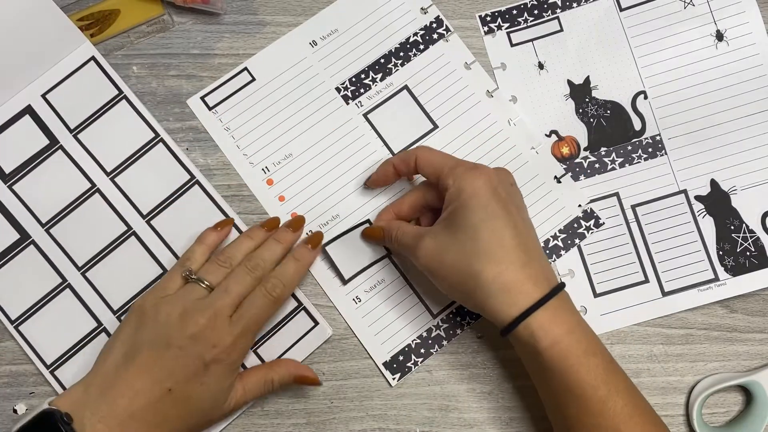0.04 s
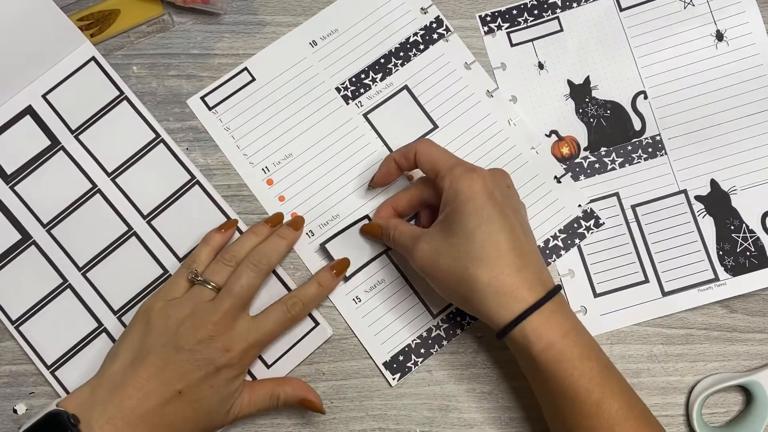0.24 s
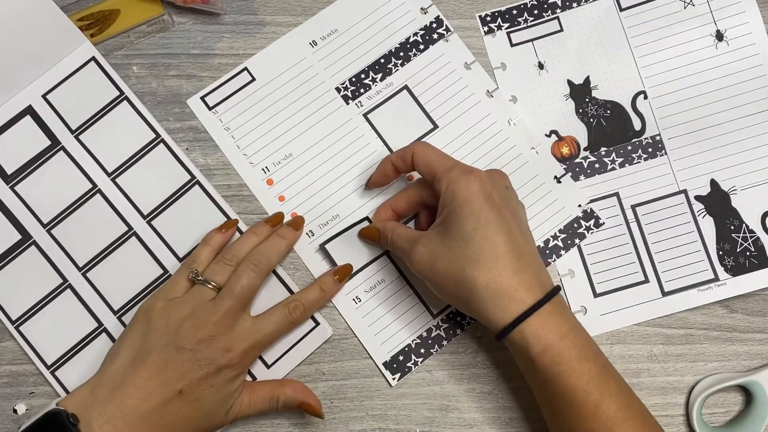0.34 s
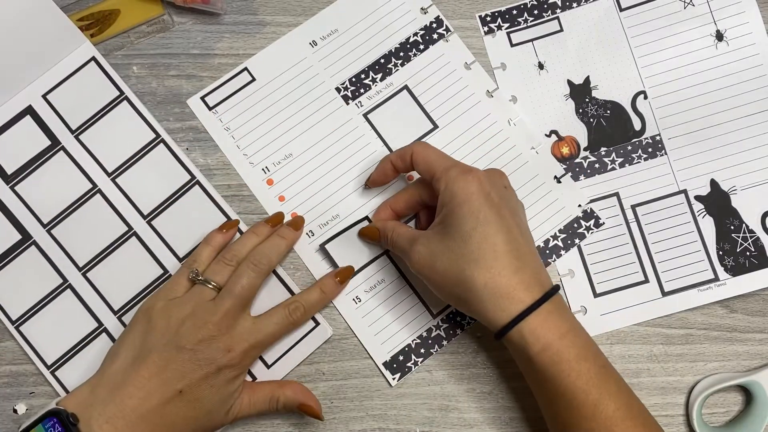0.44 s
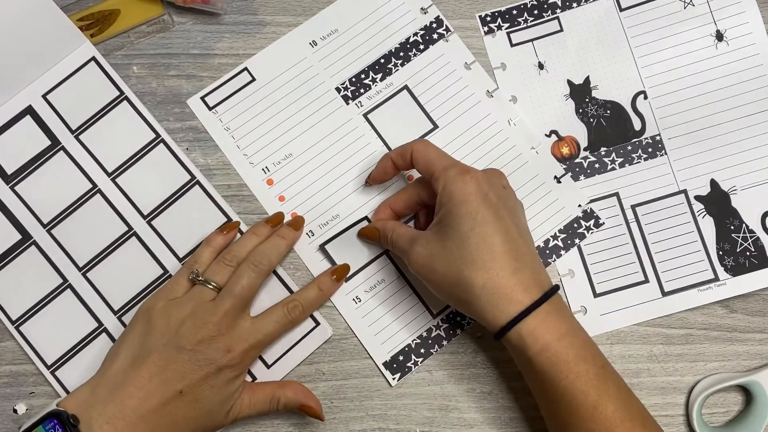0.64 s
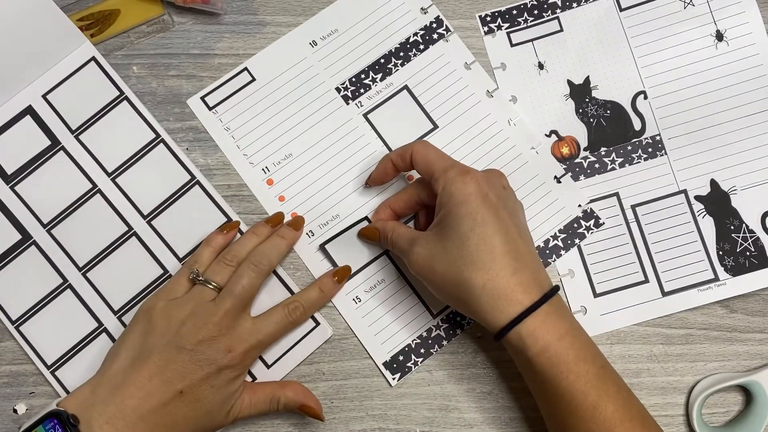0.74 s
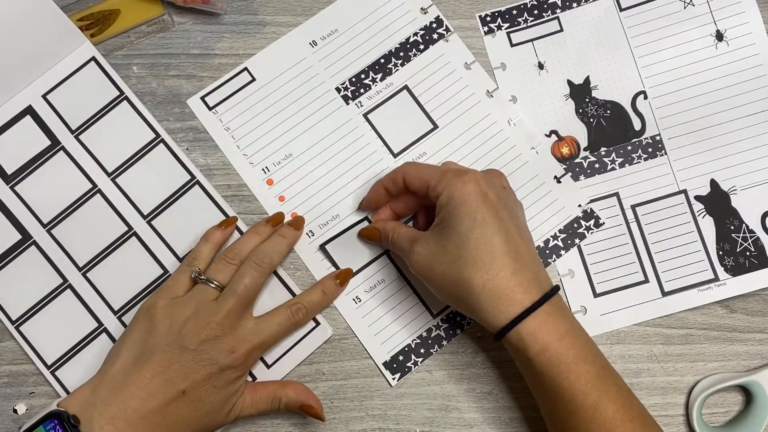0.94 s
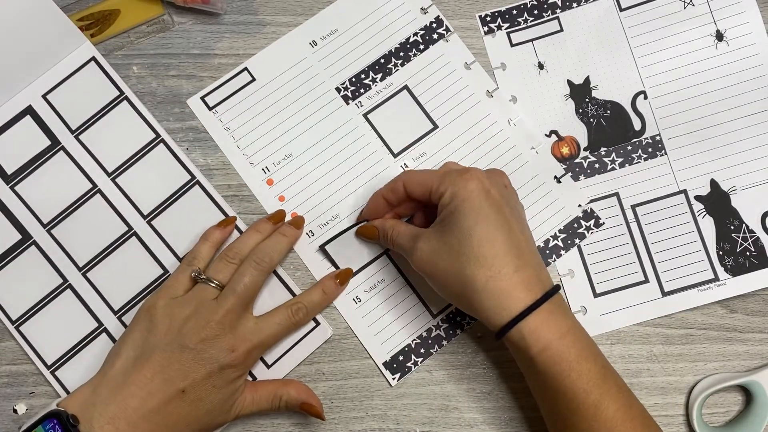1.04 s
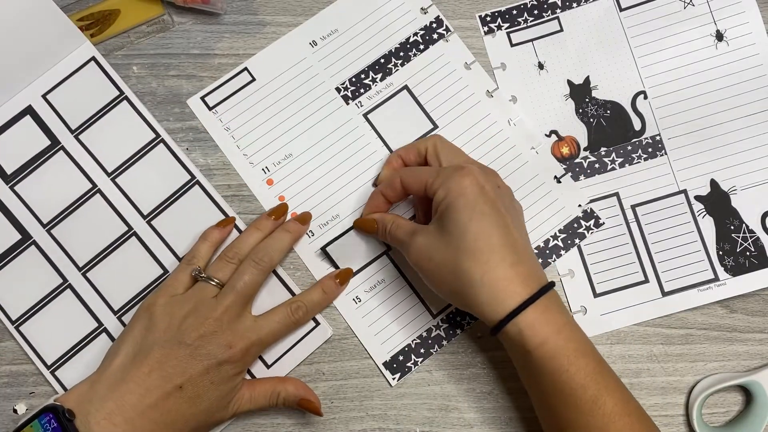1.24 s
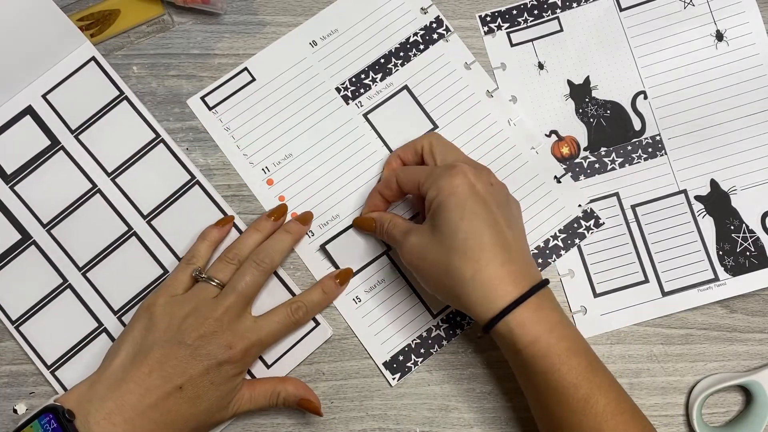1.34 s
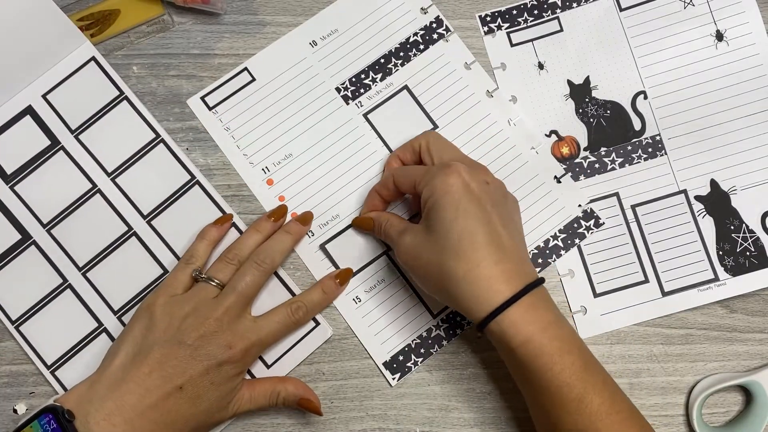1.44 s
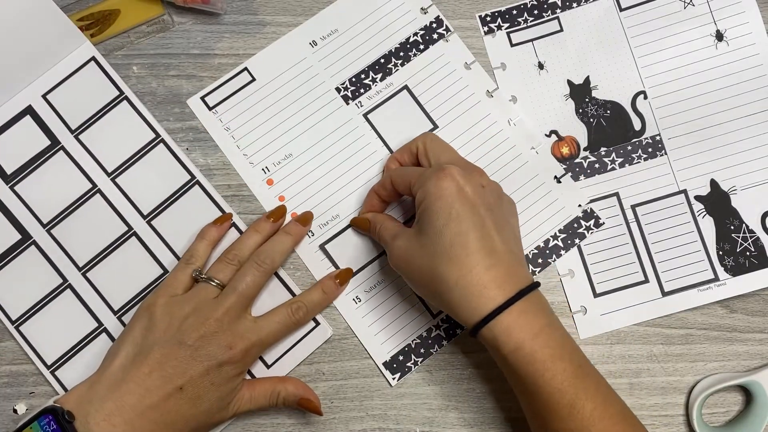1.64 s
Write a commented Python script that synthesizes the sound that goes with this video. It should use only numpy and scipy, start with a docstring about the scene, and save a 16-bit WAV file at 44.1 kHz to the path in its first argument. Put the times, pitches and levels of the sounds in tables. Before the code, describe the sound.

A paper sticker pops loose with a sharp, dry snap about a second in, after faint glue crackles and a soft nail tap; low wavering hum behind, small room, close stereo microphone.

```python
"""A small room, heard close by a stereo microphone: fingers work a paper sticker on a planner page.
The glue lets go in short crackling rips made of dense filtered clicks, and the paper slides as softer grains.
Once the stiff sticker snaps free: a filtered impulse, decaying modes, a noisy flutter and a knock on the page.
Fingernails tap softly in short noise bursts; a low machine hum of sines wavers behind, over room air."""
import sys
import numpy as np
from scipy import signal
from scipy.fft import rfft, irfft
from scipy.io import wavfile

SR = 44100
rng = np.random.default_rng(int(sys.argv[2]) if len(sys.argv) > 2 else 0)


def wrap_up_sound(samples):
    """Save the sound to the file named by the first command line argument, as 16-bit audio."""
    columns = np.atleast_2d(samples).T
    # keep every value between -1 and 1, then stretch to whole-number steps
    tamed = np.clip(columns, -1, 1)
    steps = np.round(tamed * 32767).astype(np.int16)
    wavfile.write(sys.argv[1], SR, steps)


N = 74970  # length [samples]

# Machine hum, gliding between points: (time [s], pitch [Hz], level [dB rms])
HUM_PATH = [(0, 56.7, -50.5), (.156, 54.5, -54), (.226, 54.5, -46.5), (.292, 55, -53.5), (.38, 54.5, -45.5),
            (.76, 54.58, -45.5), (.85, 54.76, -42), (1.13, 57.02, -45.5), (1.216, 57.83, -53.5),
            (1.36, 58.8, -46), (1.42, 59.74, -60), (1.7, 60.07, -50.5)]
# Faint tones of the machine: (pitch [Hz], level [dB rms])
MACHINE_TONES = [(106.5, -61.5), (215, -76.5), (268, -75), (366, -73.5), (586, -79), (668, -80.5),
                 (846, -83)]
# Spectrum of the room air: (frequency [Hz], relative level [dB])
AIR_COLOUR = [(15, -33.5), (28, -19.5), (45, -1), (80, 1), (125, -0.5), (200, -15.5), (370, -18),
              (480, -22), (850, -26), (1150, -37), (1750, -36), (2300, -48), (5500, -53), (7500, -63.5),
              (11500, -60), (16000, -74)]
AIR_DB, AIR_WIDE_HZ = -54.5, 272.8  # air level; the sides differ only above this frequency

# Soft nail taps on the page: (time [s], strength [dB])
NAIL_TAPS = [(.141, -59), (0.8757, -35), (.946, -51.5), (1.531, -58.5), (1.5847, -45)]
# Spectrum of a nail tap: (frequency [Hz], relative level [dB])
TAP_COLOUR = [(300, -12), (1000, -11), (1550, -4), (1850, -8), (2350, 1), (2900, -6), (4000, -13),
              (5500, -41), (12000, -42.5)]
# Fingertips rubbing the page: (start [s], length [s], level [dB])
FINGER_RUBS = [(.13, 0.017, -77.5), (.425, 0.054, -81), (1.525, .02, -78.5)]
# Spectrum of the rubbing: (frequency [Hz], relative level [dB])
RUB_COLOUR = [(400, -25), (1000, -6.5), (1500, 2), (1900, -2), (2600, -20), (6000, -27)]
# Spectrum of the page's dull thud: (frequency [Hz], relative level [dB])
PAGE_COLOUR = [(40, -23.5), (130, 2), (280, 0), (460, -2), (700, -16), (1500, -28), (6000, -58.5)]
PRESS_S, PRESS_LEN_S, PRESS_DB = 1.02, .028, -56.5  # a fingertip presses the page
SETTLE_DB, SETTLE_T60_S = -50.5, .15  # the page settles after the snap

# Rips of glue: (start [s], length [s], level [dB])
GLUE_RIPS = [(.024, 0.023, -77), (.2628, 0.013, -51), (.294, .018, -69), (.55, 0.0027, -77),
             (.592, 0.029, -78.5), (1.0005, .007, -56.5), (1.061, .011, -57.5)]
# Spectrum of a rip: (frequency [Hz], relative level [dB])
GLUE_COLOUR = [(300, -20), (1400, -20), (2500, -13), (3800, -20), (4700, -7), (5800, 2), (7000, -6),
               (7900, -4), (9000, -8.5), (11400, -8), (13500, -18.5), (16000, -17.5)]
# Lone ticks of glue, and at 1.0866 s the freed sticker's bounce: (time [s], strength [dB])
TICKS = [(.0205, -43), (1.0624, -31), (1.066, -34), (1.0728, -28.5), (1.075, -27), (1.0866, -16.5),
         (1.0903, -24), (1.3675, -40)]
# Spectrum of a tick: (frequency [Hz], relative level [dB])
TICK_COLOUR = [(500, -30), (2000, -22), (4000, -17), (6000, -1), (9000, 1), (11500, 0), (13500, -7),
               (16000, -10)]
# The sticker flexing, before the crease and flex gains: (start [s], length [s], level [dB])
STICKER_CREASES = [(.9645, 0.0056, -68), (.974, 0.014, -70), (1.182, 0.0071, -55)]
# Spectrum of a crease: (frequency [Hz], relative level [dB])
CREASE_COLOUR = [(500, -18), (1400, -15), (2000, -7), (3200, -3), (3800, -7.5), (5000, -9), (6600, -4),
                 (8500, -15), (12000, -18), (15500, -27)]
# Resonances of the lifted sticker as it flexes: (centre [Hz], width [Hz], relative gain [dB])
FLEX_RESONANCES = [(2900, 400, -1), (4393, 220, 2), (5535, 340, 1.5)]
# Paper sliding under the fingers, gliding between points: (time [s], level [dB])
SLIDE_LEVEL = [(0, -67.5), (.09, -82.5), (.14, -81.5), (.19, -100), (.24, -83), (.35, -88.5), (.42, -78),
               (.46, -108), (.56, -87.5), (.62, -82.5), (.68, -89.5), (.77, -81.5), (.83, -96), (.94, -86),
               (1.0, -69.5), (1.05, -68.5), (1.1, -51.5), (1.16, -100)]
# Spectrum of sliding paper: (frequency [Hz], relative level [dB])
PAPER_COLOUR = [(500, -16), (2000, -10.5), (4000, -10.5), (5500, 3.5), (6500, -1.5), (7500, -15),
                (10000, -11.5), (12500, -12.5), (16000, -21.5)]
STRAIN_S, STRAIN_LEN_S, STRAIN_DB = 1.071, 0.006, -47  # the last glue tears just before the snap
GRAINS_PER_S, GRAIN_SCATTER_DB = 3000, 4.5

# Spectrum of the snap's crack: (frequency [Hz], relative level [dB])
CRACK_COLOUR = [(200, -17), (750, -26), (1200, -14), (1600, -14), (2100, -6), (3200, -7), (4200, -5),
                (6100, 2), (7000, 1), (7700, -8), (8400, -6), (10500, -2.5), (12300, -1), (13300, -7),
                (14500, -6), (16300, -13)]
# The sticker's ring after the snap: (pitch [Hz], relative amplitude [dB], decay by 60 dB [s])
STICKER_MODES = [(1924, -43, .025), (2420, -31.5, 0.03), (3214, -37, .027), (4540, -28, .02),
                 (5100, -38.5, .025), (5963, -22.5, 0.014), (6530, -39.5, .015), (8220, -35, .018),
                 (9050, -30.5, 0.0065), (10190, -28, 0.018), (11290, -41, .018), (12035, -32.5, 0.018)]
SNAP_S, CRACK_DB, RING_DB = 1.0804, 0.5, -2
FLUTTER_DB, FLUTTER_T60_S = -28, 0.019
KNOCK_HZ, KNOCK_DB, KNOCK_T60_S, KNOCK_DELAY_S = 505, -34.5, .03, .002

DESK_DB, DESK_T60_S = -12, 0.022
EARLY_DB, EARLY_T60_S = -13, .035
ROOM_DB, ROOM_BUILD_S = -17, 0.015
ROOM_T60_S, TREBLE_T60_S, TREBLE_HZ = .28, .215, 6500
# Phase between the two microphone ports: (frequency [Hz], lead of the left [rad])
PORT_LEAD = [(0, 0), (2000, .25), (5000, .1), (5900, 1.4), (7400, 3.14), (9900, 6.2), (10700, 6.45),
             (12000, 7.8), (13500, 9.45), (16000, 11.5)]
# Balance of the two ports: (frequency [Hz], left minus right [dB])
PORT_TILT = [(200, 0), (1300, 2.5), (2400, 1), (3100, -8), (4200, -6), (5100, 1), (8000, 0)]
TOP_HZ = 16000  # upper edge of the recorder's passband


def undb(db):
    """Decibels to gain."""
    return 10 ** (np.asarray(db) / 20)


def clock():
    """Time of every sample in seconds."""
    return np.arange(N) / SR


def fade(start, t60):
    """Silence, then an exponential decay from 1 that falls 60 dB in t60 seconds."""
    age = clock() - start
    return (age >= 0) * np.exp(-np.log(1000) * np.maximum(age, 0) / t60)


def colour(x, points):
    """Causal minimum-phase filter of unit power, shaped through (Hz, dB) points."""
    size = 4096
    hz, db = np.array(points).T
    bins_hz = np.arange(size * 2 + 1) * SR / (size * 4)
    gain = undb(np.interp(np.log(bins_hz + 1), np.log(hz), db))
    # Folding the cepstrum forward in time makes the filter minimum phase
    cepstrum = irfft(np.log(gain))
    cepstrum[1:size * 2] *= 2
    cepstrum[size * 2 + 1:] = 0
    ir = irfft(np.exp(rfft(cepstrum)))[:size]
    ir = ir / np.linalg.norm(ir)
    return np.apply_along_axis(lambda v: signal.fftconvolve(v, ir)[:N], -1, x)


def band(x, hz, width):
    """One resonance, gain 1 at its centre."""
    return signal.lfilter(*signal.iirpeak(hz, hz / width, fs=SR), x)


def clicks(rows):
    """One impulse for each (s, dB) row."""
    out = np.zeros(N)
    for s, db in rows:
        out[int(s * SR)] += undb(db)
    return out


def grains():
    """Dense tiny clicks of random sign and uneven size, rms 1."""
    hits = rng.random(N) < GRAINS_PER_S / SR
    signs = rng.choice([-1, 1], N)
    sizes = undb(GRAIN_SCATTER_DB * np.clip(rng.standard_normal(N), -2, 2))
    x = hits * signs * sizes
    return x / x.std()


def bursts(rows, attack_s=0.00075, release_s=0.00084):
    """Attack, hold and release for each (s, length, dB) row."""
    t = clock()
    total = np.zeros(N)
    for s, length, db in rows:
        attack = np.clip((t - s) / attack_s, 0, 1)
        release = np.exp(-np.maximum(t - s - length, 0) / release_s)
        total += undb(db) * attack * release
    return total


def ring(start, hz, t60):
    """One struck mode: a decaying sine."""
    return fade(start, t60) * np.sin(2 * np.pi * hz * (clock() - start))


def diffuse(side_db=-6):
    """Noise that is partly alike left and right."""
    mid, side = rng.standard_normal((2, N))
    return mid + undb(side_db) * np.array([side, -side])


def background(waver=.006):
    """A wavering machine hum with faint drifting tones, over room air whose bass is alike on both sides."""
    t = clock()
    s, hz, db = np.array(HUM_PATH).T
    hum = undb(np.interp(t, s, db)) * np.sin(2 * np.pi * np.cumsum(np.interp(t, s, hz)) / SR)
    for tone_hz, tone_db in MACHINE_TONES:
        drift = np.interp(t, np.linspace(0, t[-1], 20), rng.standard_normal(20))
        cycles = np.cumsum(tone_hz * (1 + waver * drift)) / SR + rng.random()
        hum = hum + undb(tone_db) * np.sin(2 * np.pi * cycles)
    mid, side = colour(rng.standard_normal((2, N)), AIR_COLOUR)
    wide_band = signal.butter(2, [AIR_WIDE_HZ, 2500], "band", fs=SR, output="sos")
    side = signal.sosfilt(wide_band, side)
    air = mid + undb(-0.5) * side * np.array([[1], [-1]])
    return np.sqrt(2) * hum + undb(AIR_DB) * air  # sqrt(2) turns sine amplitude into rms


def fingers(contact_t60=0.015):
    """Nails tap with a short noisy scrape; fingertips rub, and the page thuds dully under them."""
    touch = sum(undb(db) * fade(s, contact_t60) for s, db in NAIL_TAPS)
    touch = touch / np.linalg.norm(fade(0, contact_t60))  # each tap's energy follows its strength
    taps = colour(rng.standard_normal(N) * touch, TAP_COLOUR)
    rubs = colour(grains() * bursts(FINGER_RUBS, attack_s=0.0069, release_s=.012), RUB_COLOUR)
    press = bursts([(PRESS_S, PRESS_LEN_S, PRESS_DB)])
    settle = undb(SETTLE_DB) * fade(SNAP_S, SETTLE_T60_S)
    thuds = colour(rng.standard_normal(N) * (press + settle), PAGE_COLOUR)
    return taps + rubs + thuds


def peeling(flex_db=10):
    """Glue threads break in rips and ticks, and the freed sticker bounces once; the sticker creases through its
    resonances and slides."""
    rips = colour(grains() * bursts(GLUE_RIPS), GLUE_COLOUR)
    ticks = colour(clicks(TICKS), TICK_COLOUR)
    strain = colour(grains() * bursts([(STRAIN_S, STRAIN_LEN_S, STRAIN_DB)]), CRACK_COLOUR)
    bend = grains() * bursts(STICKER_CREASES)
    crease = undb(-8) * colour(bend, CREASE_COLOUR)
    flex = sum(undb(db + flex_db) * band(bend, hz, width) for hz, width, db in FLEX_RESONANCES)
    slide_gain = undb(np.interp(clock(), *np.array(SLIDE_LEVEL).T))
    slide = colour(grains() * slide_gain, PAPER_COLOUR)
    return rips + ticks + strain + crease + flex + slide


def snap():
    """The sticker springs free: a crack, a brief ring and flutter, and a knock on the page."""
    crack = colour(clicks([(SNAP_S, CRACK_DB)]), CRACK_COLOUR)
    modes = np.zeros(N)
    for hz, db, t60 in STICKER_MODES:
        start = SNAP_S + rng.random() / hz  # each mode starts within its first cycle
        modes += undb(db + RING_DB) * ring(start, hz, t60)
    flutter = undb(FLUTTER_DB) * colour(grains() * fade(SNAP_S, FLUTTER_T60_S), CRACK_COLOUR)
    knock = undb(KNOCK_DB) * ring(SNAP_S + KNOCK_DELAY_S, KNOCK_HZ, KNOCK_T60_S)
    return crack + modes + flutter + knock


def room(x):
    """Desk reflections alike on both sides, scatter from things nearby, then walls whose treble dies first."""
    desk = np.tile(rng.standard_normal(N) * fade(.001, DESK_T60_S), (2, 1))
    early = diffuse() * fade(.002, EARLY_T60_S)
    noise = diffuse()
    low = signal.sosfiltfilt(signal.butter(2, TREBLE_HZ, fs=SR, output="sos"), noise)
    treble = noise - low
    build = np.minimum(clock() / ROOM_BUILD_S, 1) ** 2
    late = (low * fade(0, ROOM_T60_S) + treble * fade(0, TREBLE_T60_S)) * build
    parts = [(desk, DESK_DB), (early, EARLY_DB), (late, ROOM_DB)]
    ir = sum(undb(db) * v / np.linalg.norm(v[0]) for v, db in parts)
    return x + signal.fftconvolve(x[None], ir, axes=1)[:, :N]


def ports(x):
    """Phase and level differences between the two microphones, total power kept."""
    hz = np.fft.rfftfreq(N, 1 / SR)
    right = np.exp(-1j * np.interp(hz, *np.array(PORT_LEAD).T))
    left = undb(np.interp(hz, *np.array(PORT_TILT).T))
    return irfft(rfft(x) * np.array([left, right]) * np.sqrt(2 / (1 + left ** 2)), N)


def scene():
    """Hands and paper in the room, over the background, as the two microphones hear them."""
    hands = peeling() + snap() + fingers()
    return ports(room(hands) + background())


def record(dry):
    """The recorder cuts the top with a steep low-pass."""
    return signal.sosfilt(signal.ellip(8, .2, 70, TOP_HZ, fs=SR, output="sos"), dry)


dry = scene()
out = record(dry)
wrap_up_sound(out)
```